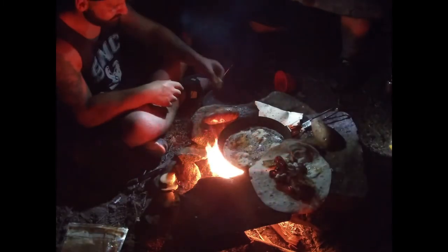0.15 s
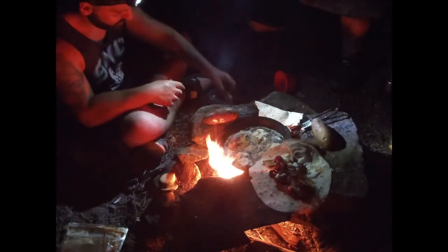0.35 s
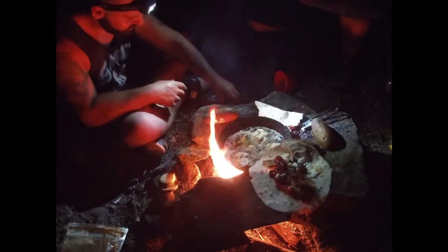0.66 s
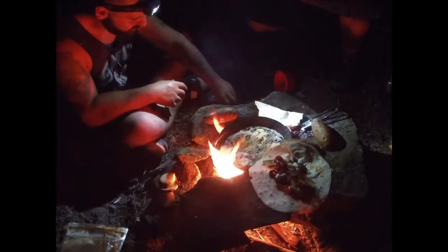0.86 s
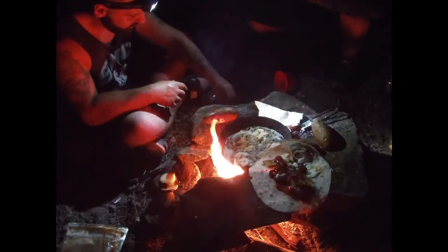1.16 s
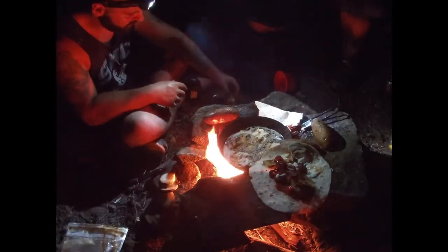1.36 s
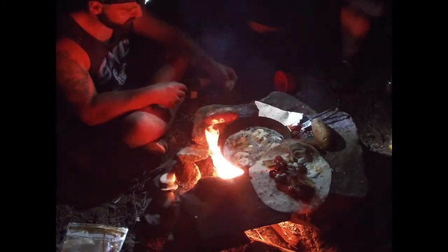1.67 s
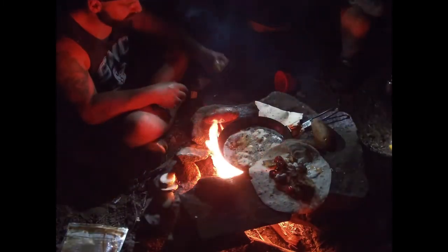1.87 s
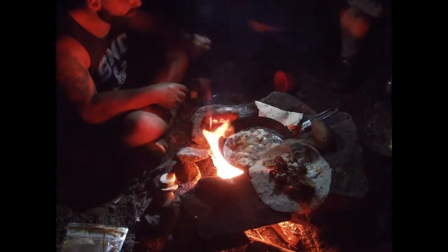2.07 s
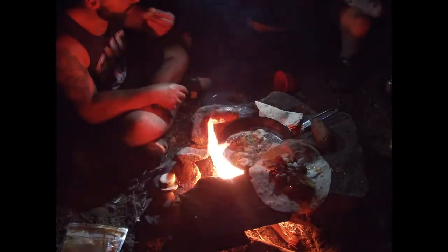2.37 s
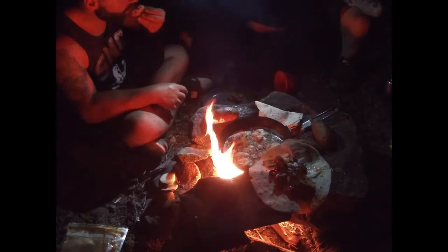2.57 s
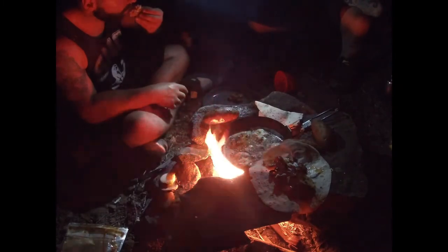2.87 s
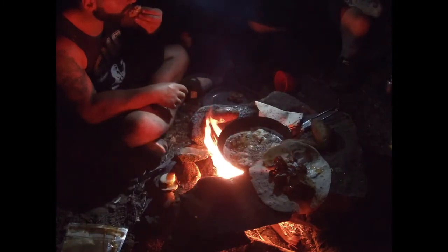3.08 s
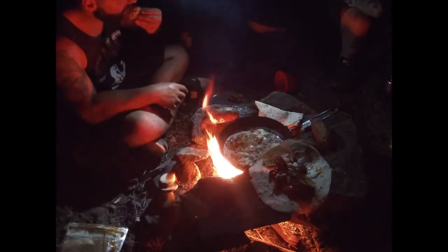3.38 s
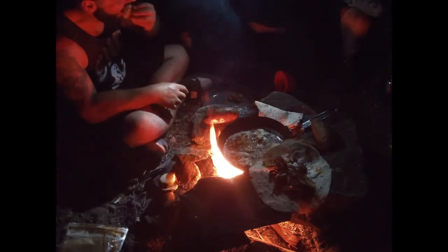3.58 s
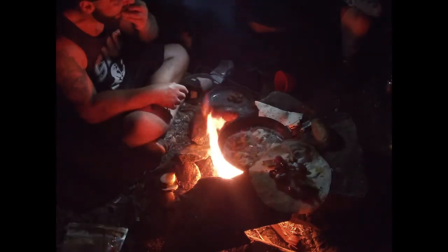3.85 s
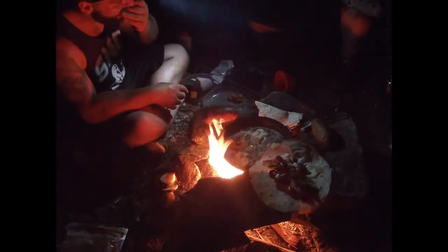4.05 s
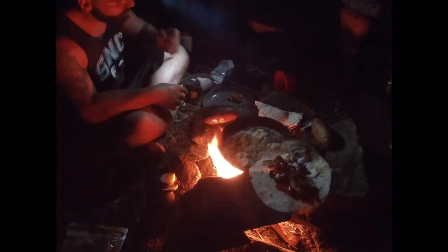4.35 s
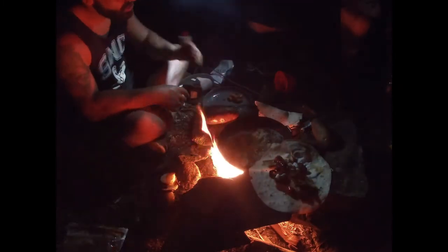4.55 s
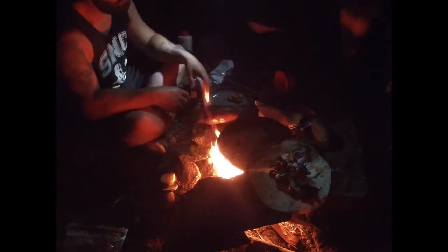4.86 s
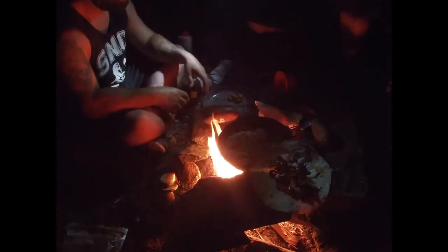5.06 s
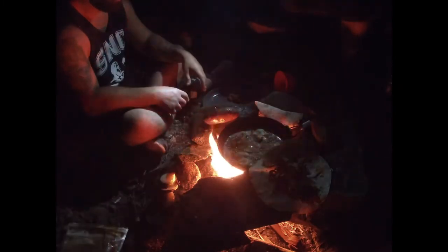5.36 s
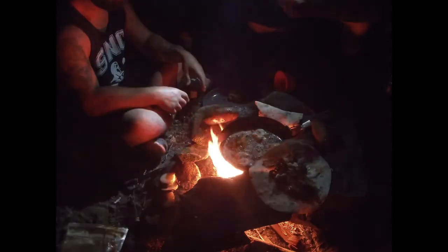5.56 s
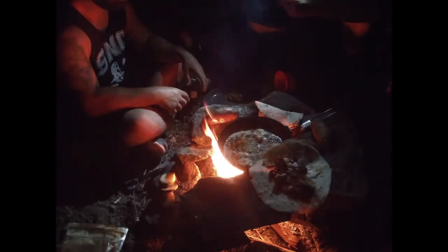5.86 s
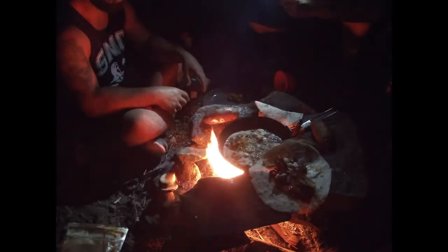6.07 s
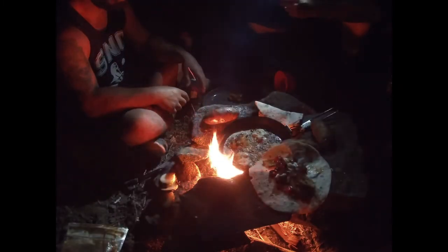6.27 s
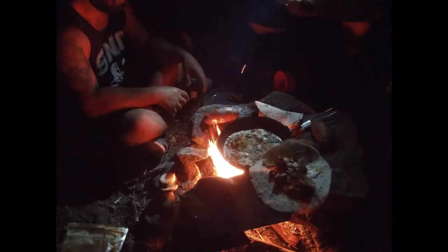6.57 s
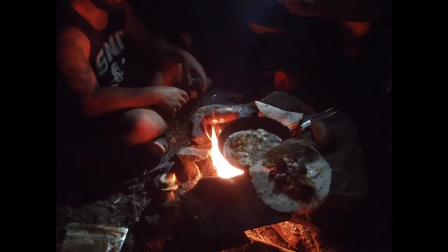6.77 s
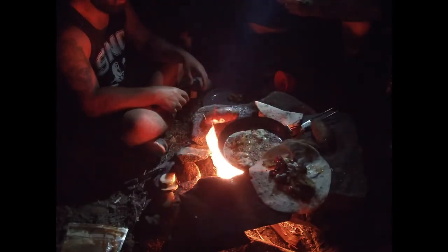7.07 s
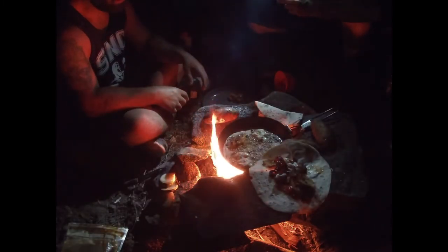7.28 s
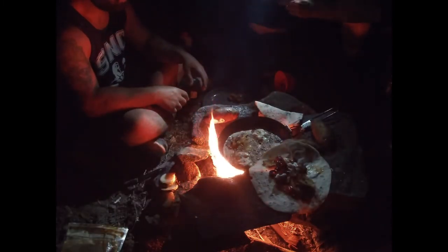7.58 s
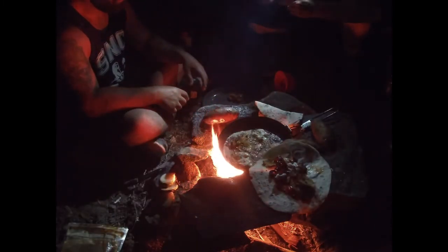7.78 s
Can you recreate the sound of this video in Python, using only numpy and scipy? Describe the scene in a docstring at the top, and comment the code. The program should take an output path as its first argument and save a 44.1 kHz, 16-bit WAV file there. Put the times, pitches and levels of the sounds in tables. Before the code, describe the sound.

Night campfire a step away: dry snaps, fine ember crackle and soft low flutter over a continuous shrill cricket drone and repeated paired katydid rasps.

```python
"""Crickets drone near 6 kHz, far off in a night forest, and a nearer one purrs within the drone.
One katydid rasps twice about every second; a small wood fire flutters, pops and ticks a step away, almost mono.
The insects are clicks ringing through wing resonances, the katydid uneven tooth clicks under swells.
Flame, draught, steam and night air are coloured noise; the wood is made of short, resonant bursts.
"""
import sys
import numpy as np
from scipy import signal
from scipy.fft import rfft, irfft
from scipy.io import wavfile
from scipy.ndimage import uniform_filter1d

SR = 44100
rng = np.random.default_rng(int(sys.argv[2]) if len(sys.argv) > 2 else 0)


def transcribe(signal):
    """Save signal, clipped to [-1, 1], as a 16-bit WAV file at the path in sys.argv[1]."""
    frames = np.atleast_2d(signal).T
    limited = np.clip(frames, -1, 1)
    pcm = np.round(limited * 32767).astype(np.int16)
    wavfile.write(sys.argv[1], SR, pcm)


N = 349713  # length in samples

# cricket kinds, levels before a slow drift:
# [pitch_hz, pitch_spread_hz (either side), ring_width_hz, strokes_per_s (average), level_db]
CRICKET_KINDS = [(5593, 130, 490, 43, -46), (5865, 117, 264, 81, -44.9), (6150, 124, 323, 81, -45.5),
                 (7084, 180, 380, 60, -57.5), (2938, 320, 306, 35, -53), (2115, 86, 176, 28, -60)]
NEAR_PITCH_HZ, NEAR_RING_WIDTH_HZ, NEAR_STROKES_PER_S, NEAR_LEVEL_DB = 6027, 390, 80.7, -52

# relative spectrum of far insects and night air: [freq_hz, density_db (per Hz)]
FOREST_SPECTRUM = [(25, -5), (55, 2.5), (110, -7.5), (200, -7), (400, -5), (700, -13), (1500, -10.3),
                   (2700, -1), (4000, -4), (5300, 1), (6600, -19), (7800, -16), (12000, -28.5),
                   (15000, -41)]

# strength of the flame's body, before trim and flicker: [time_s, level_db]
FLAME_STRENGTH = [(0, -46.5), (.2, -53), (.76, -46.5), (1.03, -54.5), (1.5, -46.5), (1.97, -47),
                  (2.13, -49), (2.5, -44.5), (2.9, -58), (3.22, -46), (4.1, -50.5), (5.15, -49.5),
                  (5.7, -46), (6.27, -48.5), (6.72, -55.5), (7.2, -45.5), (7.48, -52), (7.68, -47.5),
                  (7.93, -59)]
# relative spectrum of the low body: [freq_hz, density_db (per Hz)]
FLAME_BODY_SPECTRUM = [(90, -20.5), (125, -15), (150, -3), (190, 0.5), (235, -4.5), (285, -9), (330, -43),
                       (500, -74)]
# relative spectrum of the brighter flutter: [freq_hz, density_db (per Hz)]
FLUTTER_SPECTRUM = [(200, -15), (260, 10), (315, -2.5), (360, 5), (420, 1.5), (500, 1.5), (545, -7),
                    (800, -39)]
# leaps of the flame, added to the calm flutter before flicker: [middle_s, half_length_s, level_db]
FLAME_LEAPS = [(3.282, 0.076, -50), (4.52, 0.16, -57), (5.623, 0.38, -55), (6.125, 0.15, -58.5),
               (7.1, 0.058, -54.5)]
CALM_FLUTTER_DB = -65
# strength of the deepest rumble, before trim: [time_s, level_db]
DRAUGHT_STRENGTH = [(0, -54.5), (.68, -74), (2.15, -59.5), (4.1, -63), (5.15, -69), (5.7, -62),
                    (7.93, -65.5)]

# floor of the random ember bursts, before luck, flurries and hearth: [pitch_hz, level_db (over 4 ms)]
EMBER_FLOOR = [(700, -62), (1050, -55.5), (1500, -55.5), (2400, -51.5), (3400, -47), (5000, -49),
               (7000, -51.5), (8700, -60.5), (10300, -67)]
CRACKLE_START_DB, CRACKLE_RISE_DB_PER_S, FLURRY_DB = -6.5, 0.6165, 1.3

# katydid calls, each a pair of rasps: [first_rasp_middle_s]
KATYDID_CALL_TIMES = [.125, 1.10, 1.839, 2.80, 3.82, 5.03, 6.04, 6.96]
# relative spectrum of the katydid's wing: [freq_hz, density_db (per Hz)]
KATYDID_WING_SPECTRUM = [(1200, -27), (2040, -11), (2180, -3), (2300, -16.5), (2940, -6.5), (3100, 2),
                         (3260, -7), (3900, -10.5), (6000, -9), (8000, -37), (10500, -37), (12000, -34.5),
                         (13800, -33), (15500, -47)]
RASP_HALF_LENGTH_S, RASP_SPACING_S = 0.032, 0.15

# soft high hisses of sap steaming: [middle_s, half_length_s, level_db (at the peak), pitch_hz]
STEAM_HISSES = [(.26, 0.098, -59, 8570), (2.47, 0.13, -68, 8600), (3.456, 0.114, -61.5, 8400),
                (4.435, 0.017, -66, 11800), (6.17, 0.078, -64, 8600), (7.15, 0.14, -65, 8800)]

# pops of the wood, before the hearth: [start_s, level_db (over 4 ms), pitch_hz, spread_octaves]
WOOD_POPS = [(0.2386, -28.5, 5240, 0.11), (.286, -43, 2400, .7), (0.347, -40.5, 3700, 0.63),
             (0.609, -39.5, 3200, 0.98), (.698, -42.5, 1420, 0.64), (.9856, -36, 3000, 0.57),
             (1.2177, -29.2, 5270, 0.11), (1.2226, -33, 3800, 0.22), (1.287, -40, 1030, 0.43),
             (1.3378, -31.5, 4670, 0.45), (1.3406, -37.5, 7800, 0.088), (1.3975, -37.5, 2700, 0.57),
             (1.5184, -36, 3200, 0.59), (1.6983, -35, 5570, 0.13), (1.7764, -37, 4400, 0.31),
             (2.0037, -35, 1950, 0.45), (2.0474, -31, 3270, 0.17), (2.0533, -36, 4100, 0.074),
             (2.1424, -33, 5450, 0.2), (2.1465, -39, 6650, .07), (2.173, -37, 1550, 0.33),
             (2.1892, -40, 3000, 0.6), (2.2152, -39, 3600, 0.45), (2.2346, -34, 5800, 0.24),
             (2.3043, -41, 2900, 0.48), (2.3562, -43, 2130, 0.36), (2.5227, -39, 4600, 0.3),
             (2.5957, -34, 3500, 0.5), (2.733, -44, 1300, 0.59), (2.7984, -35.5, 4900, 0.22),
             (2.8572, -35.5, 3500, 0.39), (2.9481, -29, 2530, 0.27), (3.165, -34.5, 3200, 0.46),
             (3.349, -37.5, 2070, 0.81), (3.5558, -27, 5700, 1), (3.5597, -37.5, 2100, 0.6),
             (3.563, -39, 4700, .15), (3.6502, -41.5, 2110, .48), (4.187, -40, 2280, 0.62),
             (4.5088, -39.5, 2680, 0.64), (4.561, -36.5, 3560, 0.33), (4.6646, -40, 2200, 0.68),
             (4.732, -36.5, 2680, 0.51), (4.9308, -41, 3800, .8), (5.3374, -34.5, 2920, 0.18),
             (5.3766, -39, 4850, 1.2), (5.4828, -34.5, 3420, 0.4), (5.615, -43, 1620, 0.68),
             (5.705, -39, 4700, 0.23), (5.752, -42.5, 1510, 0.61), (5.778, -36.5, 3400, 0.45),
             (5.7867, -38, 4000, 0.5), (5.825, -41, 1180, 0.52), (6.0214, -28.5, 4500, 0.31),
             (6.033, -34.5, 2380, 0.73), (6.067, -37, 3500, 0.18), (6.2331, -42.5, 1570, 0.44),
             (6.5625, -36, 4400, 1.4), (6.871, -27.3, 5630, 0.21), (6.8813, -38, 2600, 0.163),
             (6.9362, -32.8, 2300, 0.32), (6.942, -37, 2200, .5), (6.9855, -45, 1050, 0.43),
             (7.0014, -40, 2620, 0.35), (7.156, -44, 4240, 0.37), (7.2673, -43, 1440, .33),
             (7.3044, -35, 3600, 0.49), (7.322, -35.5, 2680, 0.62), (7.3782, -35, 3630, 0.39),
             (7.5303, -31, 1740, 0.74), (7.611, -34, 4780, 0.16), (7.6244, -37.5, 4000, 0.63),
             (7.629, -41, 1620, 0.78), (7.76, -34.5, 2600, 0.089), (7.838, -43, 2740, 0.18)]
SPLINTER_DECAY_CYCLES, SPLINTER_DB = 2.4, -11.5  # cycles to fall to 1/e; ring energy against the snap

# thin ticks of sparks, before the hearth: [start_s, level_db (over 4 ms)]
SPARK_TICKS = [(.3494, -48), (1.0, -51), (1.0793, -57), (1.8537, -52), (2.2493, -54), (2.744, -47.5),
               (3.5196, -52), (4.9442, -52), (5.8678, -50), (7.636, -47), (7.885, -50)]
SPARK_PITCH_HZ, SPARK_SPREAD_OCTAVES = 10200, 0.12

# what wood and hearth stones pass of the pops, sparks and crackle: [freq_hz, gain_db]
HEARTH_RESPONSE = [(450, 2), (950, 1), (6000, -1.5), (7600, -4.5), (9400, -6), (10200, 0), (11200, -13),
                   (15000, -21)]
TOP_HZ = 15750


def undb(db):
    """Turn decibels into an amplitude factor."""
    return 10 ** (np.asarray(db) / 20)


def level(x, db):
    """Set the rms level."""
    return x * undb(db) / np.sqrt(np.mean(x ** 2))


def clock():
    """Time in seconds at every sample."""
    return np.arange(N) / SR


def curve(rows):
    """Join a table of times and values with straight lines."""
    times, values = np.transpose(rows)
    return np.interp(clock(), times, values)


def swell(middle_s, half_length_s):
    """A smooth bell-shaped rise and fall around one moment."""
    return np.exp(-.5 * ((clock() - middle_s) / half_length_s) ** 2)


def walk(rate):
    """Slow random drift with a spread near 1: held random steps, smoothed twice."""
    step = int(SR / rate)
    held = np.repeat(rng.standard_normal(N // step + 1), step)
    return 1.3 * uniform_filter1d(uniform_filter1d(held, step), step)[:N]


def colour(x, points):
    """Filter by a spectrum drawn in dB over log frequency."""
    hz, db = np.transpose(points)
    f = np.fft.rfftfreq(N, 1 / SR) + 1
    gain = undb(np.interp(np.log(f), np.log(hz), db))
    return irfft(rfft(x) * gain, N)


def ring(hz, octaves, size=1024):
    """Minimum-phase response of one broad resonance, with unit energy."""
    f = np.fft.rfftfreq(size, 1 / SR) + 1
    peak = np.exp(-(np.log2(f / hz) / (2 * octaves)) ** 2)
    skirt = undb(-48.0) / (1 + (f / hz) ** 2)
    cepstrum = irfft(np.log(peak + skirt))
    # fold the cepstrum forward so that nothing sounds before the strike
    cepstrum[1:size // 2] *= 2
    cepstrum[size // 2 + 1:] = 0
    response = irfft(np.exp(rfft(cepstrum)))
    return response / np.linalg.norm(response)


def through(x, response):
    """Ring a response that is already sounding at the start: the end of the input leads in."""
    lead = len(response) - 1
    return signal.oaconvolve(np.pad(x, (lead, 0), mode="wrap"), response, mode="valid")


def scatter(t60, wet_db):
    """The direct sound and a dying noise tail of small reflections; t60 in seconds."""
    t = np.arange(int(t60 * SR) + 2) / SR
    response = rng.standard_normal(len(t)) * undb(-60 * t / t60)
    response *= undb(wet_db) / np.linalg.norm(response)
    response[0] = 1
    return response


def strikes(times, sizes):
    """A train of single-sample clicks."""
    return np.bincount((times * SR).astype(int), sizes, N)[:N]


def strokes(rate, jitter):
    """Wing clicks at nearly regular intervals, with random strengths."""
    count = int(1.2 * rate * N / SR)  # spare clicks fall past the end
    times = np.cumsum(np.exp(jitter * rng.standard_normal(count))) / rate
    return strikes(times, undb(2.76 * rng.standard_normal(count)))


def wing_ring(hz, width_hz, size=2048):
    """A struck wing's ring builds up, then dies away."""
    t = np.arange(size) / SR
    return t * np.exp(-np.pi * width_hz * t) * np.sin(2 * np.pi * hz * t)


def chorus(count=8):
    """Each cricket's strokes ring its own wing pitch; the trees smear them into one drone."""
    out = 0
    for hz, spread_hz, width_hz, rate, db in CRICKET_KINDS:
        kind = 0
        for place in np.linspace(-1, 1, count):
            wing = wing_ring(hz + place * spread_hz, width_hz)
            clicks = strokes(rate * np.exp(.05 * rng.standard_normal()), jitter=.1)
            # each cricket is heard by its own scattered path
            path = signal.fftconvolve(wing, scatter(t60=0.32, wet_db=5.0))
            kind = kind + through(clicks, path)
        out = out + level(kind, db) * undb(0.3 * walk(4.1))
    return out


def near_cricket():
    """One cricket is close enough for its even strokes to give the drone a fine, steady purr."""
    clicks = strokes(NEAR_STROKES_PER_S, jitter=.025)
    return level(through(clicks, wing_ring(NEAR_PITCH_HZ, NEAR_RING_WIDTH_HZ)), NEAR_LEVEL_DB)


def forest():
    """Far insects and night air as shaped noise; only the very top differs between left and right."""
    air = level(colour(rng.standard_normal(N), FOREST_SPECTRUM), -49.0) * undb(0.16 * walk(8.3))
    side = level(through(rng.standard_normal(N), ring(hz=12810, octaves=0.076)), -80.0)
    return air + side * np.array([[1], [-1]])


def flame():
    """Turbulent burning gas: a low body, with a brighter flutter that swells when the flame leaps."""
    body = level(colour(rng.standard_normal(N), FLAME_BODY_SPECTRUM), -1.13)
    body = body * undb(curve(FLAME_STRENGTH) + 0.94 * walk(23))
    leaps = sum(undb(db) * swell(s, half_s) for s, half_s, db in FLAME_LEAPS)
    flutter = level(colour(rng.standard_normal(N), FLUTTER_SPECTRUM), 0)
    flutter = flutter * (undb(CALM_FLUTTER_DB) + leaps) * undb(1.8 * walk(25))
    return body + flutter


def draught():
    """Air drawn into the fire: noise through one deep resonance rumbles below the flame's body."""
    rumble = through(rng.standard_normal(N), ring(hz=73.8, octaves=0.22, size=8192))
    return level(rumble, -1.6) * undb(curve(DRAUGHT_STRENGTH))


def crackle(count=2800, spread_db=3.5, size=256):
    """Embers patter: each burst has its own pitch, width and strength, and few are strong."""
    out = np.zeros(N + size)
    pitches, levels = np.transpose(EMBER_FLOOR)
    for when, pitch, width, luck in rng.random((count, 4)):
        hz = pitches[0] * (pitches[-1] / pitches[0]) ** pitch
        db = np.interp(hz, pitches, levels) + spread_db * min(-np.log1p(-luck), 3.0)
        octaves = (.15 + 0.34 * width) / (1 + (hz / 5000) ** 2)  # the smallest splinters ring the purest
        start = int(when * N)
        out[start:start + size] += ring(hz, octaves, size=size) * undb(db) * np.sqrt(.004 * SR)
    # the embers grow steadily louder, and come in flurries
    liveliness_db = CRACKLE_START_DB + CRACKLE_RISE_DB_PER_S * clock()
    return out[:N] * undb(liveliness_db + FLURRY_DB * walk(22))


def katydid():
    """A file dragged over the wing edge, twice a call: uneven tooth clicks under a flat-topped swell."""
    drags = 0
    for s in KATYDID_CALL_TIMES:
        first = swell(s, RASP_HALF_LENGTH_S)
        second = swell(s + RASP_SPACING_S, RASP_HALF_LENGTH_S)
        drags = drags + first + second
    effort = np.tanh(1.34 * drags)  # flattens the tops
    catching = undb(2.6 * walk(140))
    teeth = level(strokes(rate=480, jitter=.3), 0) * effort * catching
    return level(colour(through(teeth, scatter(t60=0.22, wet_db=1.0)), KATYDID_WING_SPECTRUM), -51.0)


def hisses():
    """Brief thin jets of steam: noise through a narrow high resonance."""
    out = 0
    for s, half_s, db, hz in STEAM_HISSES:
        jet = through(rng.standard_normal(N), ring(hz, octaves=0.063))
        out = out + jet * undb(db) * swell(s, half_s)
    return out


def pops():
    """A gas pocket snaps and the splinter rings on; broad snaps are clean, narrow ones tear more."""
    out = np.zeros(N + SR)
    for s, db, hz, octaves in WOOD_POPS:
        snap = ring(hz, max(octaves, .06))
        cycles = hz * np.arange(len(snap)) / SR
        splinter = np.sin(2 * np.pi * cycles) * np.exp(-cycles / SPLINTER_DECAY_CYCLES)
        splinter = undb(SPLINTER_DB) * splinter / np.linalg.norm(splinter)
        tear = scatter(t60=0.012, wet_db=-1.0 - 3 * octaves)
        pop = signal.fftconvolve(snap + splinter, tear)
        start = int(s * SR)
        # the level holds the pop's whole energy as if spread over 4 ms
        out[start:start + len(pop)] += pop * undb(db) * np.sqrt(.004 * SR) / np.linalg.norm(pop)
    return out[:N]


def sparks():
    """Tiny splinters burst off with a thin, high tick."""
    s, db = np.transpose(SPARK_TICKS)
    clicks = strikes(s, undb(db) * np.sqrt(.004 * SR))
    return through(clicks, ring(SPARK_PITCH_HZ, SPARK_SPREAD_OCTAVES))


def wood():
    """Pops, sparks and crackle scatter briefly off the hearth stones."""
    stones = scatter(t60=0.05, wet_db=-10)
    return colour(through(pops() + sparks() + crackle(), stones), HEARTH_RESPONSE)


def scene():
    """Insects and night air around the small fire."""
    insects = chorus() + near_cricket() + katydid()
    fire = flame() + draught() + wood() + hisses()
    return insects + forest() + fire


def record(dry):
    """A steep low-pass closes off the very top."""
    low_pass = signal.ellip(10, .1, 80, TOP_HZ, fs=SR, output="sos")
    return signal.sosfilt(low_pass, dry)


dry = scene()
out = record(dry)
transcribe(out)
```